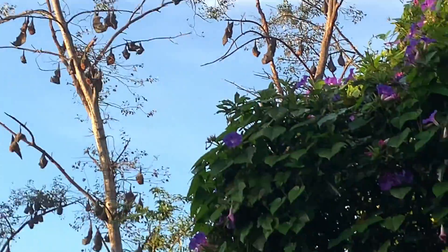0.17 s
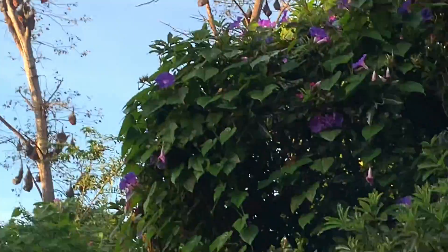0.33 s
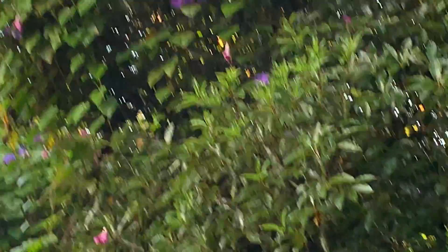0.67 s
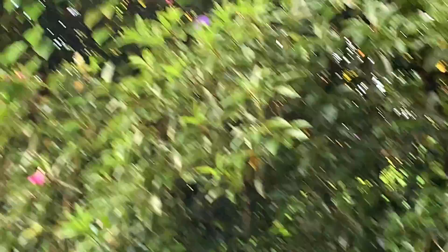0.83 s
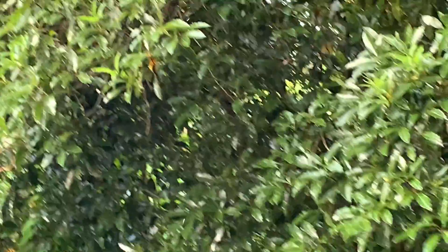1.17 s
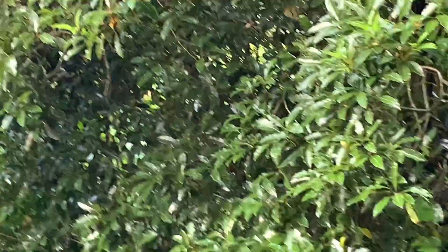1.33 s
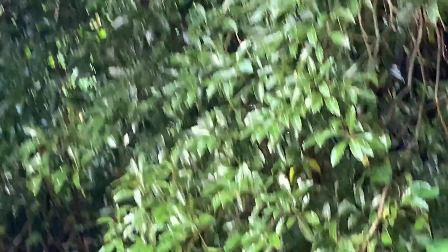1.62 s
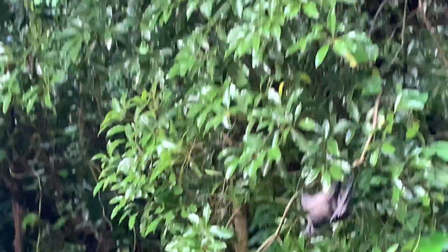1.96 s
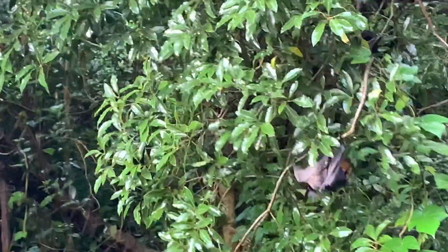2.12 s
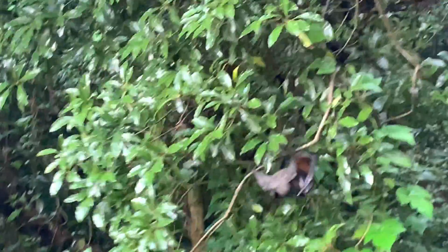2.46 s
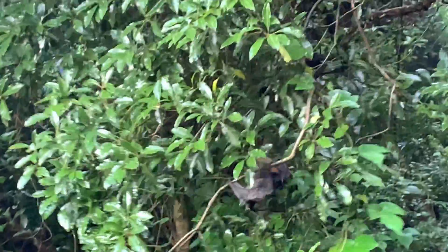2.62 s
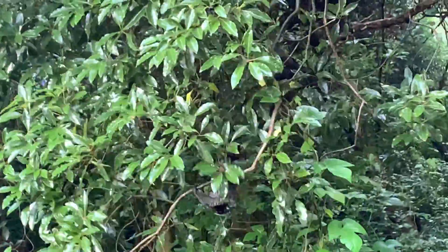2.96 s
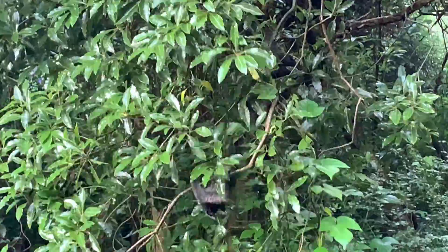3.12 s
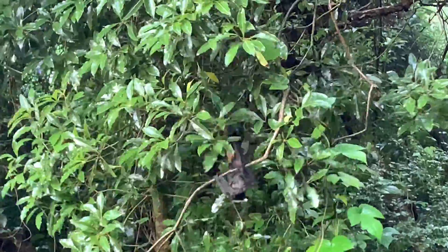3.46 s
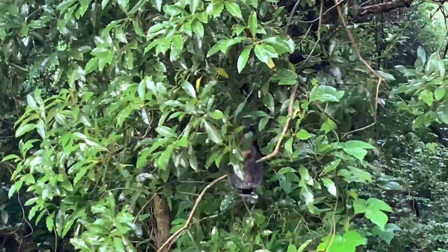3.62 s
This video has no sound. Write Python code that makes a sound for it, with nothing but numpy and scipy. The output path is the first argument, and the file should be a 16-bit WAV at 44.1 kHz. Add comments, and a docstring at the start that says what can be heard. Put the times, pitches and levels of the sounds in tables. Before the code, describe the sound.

Many distant bats chatter outdoors, with nearer rasping screeches, faint hoots and occasional rustles over a low rumble. Close by, one scolds in short bursts and others grumble; a high squeal, rough shrieks and a squeaky chitter follow.

```python
"""A flying fox colony roosts in trees. From the start, hundreds of far bats chatter over a low outdoor
rumble, with nearer rasps, distant hoots and now and then a bright rustle. After a second, one bat
scolds close by and others grumble. A long squeal follows, then harsh shrieks, and after three seconds
a thin squeak and a quick chitter. Buzzy calls are pulses of the vocal folds shaped by the throat;
whistled ones are a few unsteady tones. Trunks and leaves scatter every call."""
import sys
import numpy as np
from scipy import signal
from scipy.fft import rfft, irfft, next_fast_len
from scipy.io import wavfile

SR = 44100
rng = np.random.default_rng(int(sys.argv[2]) if len(sys.argv) > 2 else 0)


def store_pcm(level_fs):
    """Save levels as 16-bit WAV."""
    pcm = np.round(np.clip(level_fs, -1, 1) * 32767).astype(np.int16)
    wavfile.write(sys.argv[1], SR, np.atleast_2d(pcm).T)


N = 167139

NEAR_WET_DB, MID_WET_DB = -12, 3.5  # echo level against the direct sound: near bats, the next trees
RIGHT_SIDE_S = -.00027  # a sound from the right reaches the right channel this much sooner
WAVER_HZ = 332.3  # how fast the pitch of a torn note shakes


def undb(db):
    """Turn decibels into a factor to multiply by."""
    return 10 ** (np.asarray(db) / 20)


def unit(x):
    """Scale a signal to an average strength (rms) of 1."""
    return x / np.sqrt(np.mean(x ** 2) + 1e-18)


def colour(x, points):
    """Make some frequencies louder and others softer, along points of f/Hz, level/dB."""
    hz, db = np.array(points, float).T
    n = x.shape[-1]
    size = next_fast_len(n + 256)
    f = np.arange(size // 2 + 1) * SR / size
    gain = undb(np.interp(np.log(f + 1), np.log(hz), db))
    return irfft(rfft(x, size) * gain, size)[..., :n]


def wobble(n, hz):
    """Random wavering at about this rate, with a typical size of 1; at the rate SR it is hiss."""
    at = np.arange(n) * hz / SR
    knots = np.random.default_rng(rng.integers(2 ** 31)).standard_normal(int(at[-1]) + 2)
    return np.sqrt(1.5) * np.interp(at, np.arange(len(knots)), knots)


def gesture(length, hz, end_hz, attack_s=.0081, release_s=.025):
    """Pitch and loudness of one call: it slides, bowing up in the middle, and fades in and out."""
    t = np.arange(int(max(length, .01) * SR)) / SR
    progress = t / t[-1]
    shape = np.clip(t / attack_s, 0, 1) * np.clip((t[-1] - t) / release_s, 0, 1)
    arch = 1 + .01905 * (np.sin(np.pi * progress) - 2 / np.pi)
    return (hz + (end_hz - hz) * progress) * arch, unit(shape)


def whistle(hz, partials_db, jitter, flutter_db, flutter_hz):
    """Tones at 1, 2, 3... times the pitch (partials); jitter shakes the pitch, flutter the loudness."""
    n = len(hz)
    phase = 2 * np.pi * np.cumsum(hz * (1 + jitter * wobble(n, hz=1309.5))) / SR
    tone = sum(undb(db) * np.sin((k + 1) * phase) for k, db in enumerate(partials_db))
    return unit(tone * undb(flutter_db * wobble(n, flutter_hz)))


def buzz(hz, rough):
    """Uneven pulses of the vocal folds, with a puff of air once a cycle."""
    n = len(hz)
    unsteady = 1 + .0913 * rough * wobble(n, hz=600) + .00408 * wobble(n, hz=60.3)
    cycles = np.cumsum(hz * unsteady) / SR
    offset = (cycles % 1 - .5) * SR / hz  # samples from the nearest pulse
    pulses = np.sinc(offset) * np.exp(-(offset / 6) ** 2)
    air = np.exp(-(cycles % 1) / .5) * wobble(n, SR)
    voice = unit(pulses - pulses.mean()) + 1.79 * rough * unit(air)
    return voice * undb(3.5 * rough * wobble(n, hz=176.5))


def throat_filter(x, points):
    """The throat rings after each pulse, most at the peaks among the points of f/Hz, level/dB."""
    hz, db = np.array(points, float).T
    size = 512
    f = np.arange(size // 2 + 1) * SR / size
    gain = undb(np.interp(np.log(f + 1), np.log(hz), db))
    # folding the cepstrum (the log spectrum turned into time) puts all ringing after the pulse
    cepstrum = irfft(np.log(gain))
    cepstrum[1:size // 2] *= 2
    cepstrum[size // 2 + 1:] = 0
    ring = irfft(np.exp(rfft(cepstrum)))
    return signal.fftconvolve(x, ring)[:len(x)]


def add(out, start, x, lead=0):
    """Mix a sound into both channels; the left gets it lead seconds sooner (later if negative)."""
    for channel, at in zip(out, (start, start + lead)):
        i = int(round(at * SR))
        a, b = max(i, 0), min(i + len(x), N)
        if b > a:
            channel[a:b] += x[a - i:b - i]


def trees(x, wet_db, fade_s=.46, dull_hz=5550):
    """Trunks and leaves scatter a sound into a short, duller echo, different on each side."""
    t = np.arange(SR // 2) / SR
    tail = rng.standard_normal((2, len(t))) ** 3 * np.exp(-np.log(1000) * t / fade_s)
    lowpass = signal.butter(1, dull_hz, fs=SR, output="sos")
    tail = signal.sosfilt(lowpass, unit(tail)) / np.sqrt(len(t))
    echo = signal.fftconvolve(x, tail, axes=1)[:, :N]
    return (x + undb(wet_db) * echo) / np.hypot(1, undb(wet_db))


def rumble(alike_below_hz=473):
    """Low outdoor background noise, alike on both sides in the bass."""
    # tone of the noise: f/Hz, relative level/dB
    spectrum = [(20, -36), (30, -27), (40, -2.5), (55, 1.5), (80, 1), (110, -13.5), (200, -10.5),
                (350, -15.5), (570, -21), (800, -27), (2000, -20), (16000, -47)]
    # its loudness over time: t/s, level/dB
    loudness = [(0, -47), (1.45, -48), (1.6, -45.5), (2.4, -47), (3.2, -46.5), (3.79, -45)]
    mid, side = rng.standard_normal((2, N))
    side = signal.sosfilt(signal.butter(1, alike_below_hz, "high", fs=SR, output="sos"), side)
    noise = unit(colour(np.array([mid + side, mid - side]), spectrum))
    return noise * undb(np.interp(np.arange(N) / SR, *np.array(loudness).T))


def colony(calls_per_s=70, call_s=.07, call_hz=620.1):
    """Many far bats chatter at once, each with its own pitch, slide, roughness and place."""
    # tone of the far throats: f/Hz, relative level/dB
    throat = [(100, -31), (400, -25.5), (570, -16), (700, -26.5), (880, -24.5), (1100, -16), (1400, -16),
              (2150, -11), (2450, -5.5), (3250, -3.5), (4000, -8), (5500, -13), (6700, -12), (7500, -14),
              (9300, -22), (10800, -25), (13500, -28), (16000, -29)]
    # loudness of the whole roost: t/s, level/dB
    loudness = [(0, -31), (.15, -35.5), (.22, -38.5), (.5, -34), (.75, -36.5), (1.0, -33), (1.2, -27),
                (1.45, -31), (1.7, -32), (2.0, -28), (2.199, -29.5), (2.5, -31.5), (2.85, -33), (3.05, -33),
                (3.4, -34), (3.79, -31.5)]
    out = np.zeros((2, N))
    for k in range(int(calls_per_s * (N / SR + call_s))):
        long, high, glide, loud, rough = rng.standard_normal(5).clip(-2, 2)
        when, place = rng.random(2)
        hz = call_hz * np.exp(.3 * high)
        pitch, shape = gesture(call_s * np.exp(.5 * long), hz, hz * np.exp(.08 * glide))
        voice = unit(buzz(pitch, min(.26 * np.exp(.45 * rough), 1)))
        lead = .0003 + .00025 * (2 * place - 1)  # the roost spreads out to the left
        add(out, (k + when) / calls_per_s - call_s, undb(3 * loud) * shape * voice, lead)
    din = unit(colour(trees(out, wet_db=0), throat))
    return din * undb(np.interp(np.arange(N) / SR, *np.array(loudness).T))


def hoots():
    """Low, nearly pure calls from further off."""
    # one hoot a row: start/s, length/s, pitch/Hz, end pitch/Hz, level/dB, lead on the left/s
    calls = [(0.182, 0.082, 1138, 1088, -46.5, 0.0017), (0.26, 0.06, 1118, 1087, -48, 0.0048),
             (0.689, 0.19, 1137, 1088, -49, 0.0019), (0.755, 0.12, 1786, 1715, -48, -0.0018),
             (0.846, 0.18, 1708, 1735, -47, -0.0023), (1.21, 0.039, 802, 850, -52.5, -.0002),
             (1.26, 0.101, 1087, 1182, -50.5, 0.00015), (1.416, 0.045, 1060, 925, -46.5, -.0002),
             (1.764, 0.12, 1054, 1155, -51, 0.0047), (1.95, 0.051, 880, 835, -50, 0.0039),
             (2.269, 0.12, 1077, 1109, -48, 0.0067), (2.329, 0.234, 1556, 1558, -51.5, -.0002),
             (2.367, 0.047, 984, 920, -50, -0.006), (2.482, 0.035, 970, 916, -47.5, -0.0031),
             (2.73, 0.055, 1176, 1105, -53, -0.0018), (3.108, 0.2, 1120, 1102, -52.5, -.0002),
             (3.325, 0.11, 1075, 1006, -48.5, -0.0033)]
    out = np.zeros((2, N))
    for start, length, hz, end_hz, db, lead in calls:
        pitch, shape = gesture(length, hz, end_hz)
        voice = whistle(pitch, partials_db=[0, -31], jitter=.041, flutter_db=3, flutter_hz=68)
        add(out, start, undb(db) * shape * voice, lead)
    return trees(out, wet_db=-2)


def rustles():
    """Bright, grainy swishes close by, each swelling and fading."""
    # one swish a row: start/s, length/s, level/dB
    swishes = [(-.03, 0.23, -47), (1.194, 0.2, -38), (1.614, 0.23, -43), (1.985, 0.52, -50),
               (2.272, 0.17, -41), (2.344, 0.17, -40), (2.547, 0.36, -50), (3.2, 0.18, -48),
               (3.738, 0.1, -45)]
    # their tone: f/Hz, relative level/dB
    spectrum = [(2000, -40), (6500, 5.5), (9500, 4.5), (11000, 0.5), (12500, -1), (15500, 0)]
    out = np.zeros((2, N))
    for start, length, db in swishes:
        n = int(length * SR)
        grains = colour(wobble(n, SR) * undb(2.5 * wobble(n, hz=358)), spectrum)
        swell = np.sin(np.pi * np.arange(n) / n)
        add(out, start, undb(db) * unit(grains * swell), RIGHT_SIDE_S)
    return out


def harsh_calls(calls, throat):
    """Very rough pulses of the vocal folds ring through a throat."""
    out = np.zeros((2, N))
    for start, length, hz, end_hz, db, rough in calls:
        pitch, shape = gesture(length, hz, end_hz)
        voice = unit(throat_filter(buzz(pitch, rough), throat))
        add(out, start, undb(db) * shape * voice, RIGHT_SIDE_S)
    return trees(out, MID_WET_DB)


def grumbles():
    """Hoarse calls through a throat that rings low."""
    # one grumble a row: start/s, length/s, pitch/Hz, end pitch/Hz, level/dB, roughness/0-1
    calls = [(1.1, 0.15, 436, 440, -45.5, 0.94), (1.28, 0.069, 436, 461, -39, .6),
             (1.41, 0.079, 474, 437, -39.5, 0.5), (1.76, 0.26, 397, 418, -41, .8)]
    # tone of the throat: f/Hz, relative level/dB
    throat = [(150, -50), (700, -24), (1100, -8), (1650, 10), (2200, -4), (4000, -23), (12000, -50)]
    return harsh_calls(calls, throat)


def shrieks():
    """Harsh calls, made bright by a wide open mouth."""
    # one shriek a row: start/s, length/s, pitch/Hz, end pitch/Hz, level/dB, roughness/0-1
    calls = [(1.9, 0.092, 518, 484, -39, 0.7), (2.275, 0.11, 570, 607, -40, 0.77),
             (2.351, 0.18, 619, 598, -37, 0.73), (2.55, 0.063, 605, 630, -33.5, 0.87),
             (2.602, 0.061, 591, 622, -37, 0.59), (2.662, 0.053, 598, 575, -34.5, 0.95)]
    # tone of the open throat: f/Hz, relative level/dB
    throat = [(150, -40), (500, -32), (1500, -16), (2600, -16), (3800, -24), (4900, -5), (6000, -3),
              (7400, 0), (9300, -5), (10800, -21), (16000, -12)]
    return harsh_calls(calls, throat)


def rasps():
    """Bats in the next trees, to the left, screech on one torn note and its overtone."""
    # one rasp a row: start/s, length/s, pitch/Hz, end pitch/Hz, level/dB, overtone against the note/dB
    calls = [(.0, 0.2, 3280, 3243, -41.5, 6), (0.099, 0.07, 3270, 3210, -33.5, -6),
             (0.246, .04, 3280, 3230, -41, -22), (0.299, 0.06, 3236, 3250, -38, -12),
             (0.351, 0.15, 3320, 3100, -33, -9.5), (0.493, 0.14, 3126, 3047, -33.5, -6),
             (0.597, 0.097, 3255, 3210, -33, 0), (0.854, 0.22, 3255, 3070, -36.5, -4.5),
             (1.423, 0.17, 3140, 2930, -36, -24), (1.544, 0.037, 5300, 4980, -36, -26),
             (1.557, 0.014, 3200, 3230, -31, -20), (1.592, 0.066, 3123, 3148, -29, -17),
             (1.617, 0.081, 6100, 6170, -36, -7), (1.849, 0.079, 3320, 3640, -32.5, -27),
             (1.991, 0.073, 2696, 2804, -33.5, -23), (2.009, 0.037, 3180, 3170, -33.5, -30),
             (2.168, 0.1, 3095, 2980, -39, -9), (2.27, 0.24, 2950, 2700, -39, -9),
             (2.411, 0.062, 4910, 4900, -34, -22), (2.79, 0.116, 3520, 3330, -45, -23),
             (2.92, 0.21, 3250, 3170, -37, -30), (3.022, 0.13, 2760, 2680, -41.5, -28),
             (3.141, 0.053, 2750, 2433, -34.5, -9), (3.222, 0.056, 2485, 2480, -35, 1),
             (3.045, .45, 4830, 4840, -42.5, -30), (3.323, 0.052, 3140, 3116, -39, -18),
             (3.453, 0.26, 3227, 3324, -37, -17), (3.463, 0.27, 2673, 2826, -39, -0.5)]
    out = np.zeros((2, N))
    for start, length, hz, end_hz, db, overtone_db in calls:
        pitch, shape = gesture(length, hz, end_hz)
        pitch = pitch * (1 + .03 * wobble(len(pitch), WAVER_HZ))
        voice = whistle(pitch, [0, overtone_db, -47], jitter=.04, flutter_db=1.5, flutter_hz=161.6)
        add(out, start, undb(db) * shape * voice, lead=.00033)
    return trees(out, MID_WET_DB)


def chitter(count=4, start_s=3.245, notes_per_s=18.8, level_db=-40):
    """A near bat gives a sizzling run of short, high, rising notes."""
    # the first three partials of a note: relative level/dB
    partials = [0, -14, -2]
    out = np.zeros((2, N))
    for k in range(count):
        pitch, shape = gesture(length=.06, hz=4880, end_hz=5210)
        voice = whistle(pitch, partials, jitter=.024, flutter_db=5, flutter_hz=589)
        add(out, start_s + k / notes_per_s, undb(level_db) * shape * voice, RIGHT_SIDE_S)
    return trees(out, NEAR_WET_DB)


def torn_note(curve, octave_db):
    """One long whistled note from a near bat; the rougher it gets, the more its pitch shakes."""
    times, hz, db, rough, third_db = np.array(curve).T
    t = np.arange(times[0], times[-1], 1 / SR)
    torn = np.interp(t, times, rough)
    pitch = np.interp(t, times, hz) * (1 + .012 * torn * wobble(len(t), WAVER_HZ))
    partials = [0, octave_db, np.interp(t, times, third_db)]
    voice = whistle(pitch, partials, jitter=.055 * torn, flutter_db=2.5, flutter_hz=682)
    out = np.zeros((2, N))
    add(out, times[0], voice * undb(np.interp(t, times, db)), RIGHT_SIDE_S)
    return trees(out, NEAR_WET_DB)


def squeak():
    """A thin, high note that climbs and frays."""
    # course of the note: t/s, pitch/Hz, level/dB, roughness, third partial against the first/dB
    curve = [(3.08, 3580, -58, 0, 0), (3.13, 3740, -47.5, 0.5, 2), (3.2, 4020, -49, 0.8, 5),
             (3.28, 4210, -41, 0.7, -4), (3.42, 4220, -44, 0.8, 0), (3.52, 4150, -62, .9, 0)]
    return torn_note(curve, octave_db=-16)


def squeal():
    """A loud note that rises and tears as its third partial grows shrill."""
    # course of the note: t/s, pitch/Hz, level/dB, roughness, third partial against the first/dB
    curve = [(1.655, 3590, -44, 0.32, -18), (1.685, 3660, -28.5, 0.15, -9), (1.72, 3660, -33, 0.3, -7),
             (1.75, 3780, -36, 0.55, 0.5), (1.8, 3870, -32, 0.75, -5), (1.88, 3890, -37, 0.9, -4),
             (1.95, 3710, -34, 1.3, -12)]
    return torn_note(curve, octave_db=1.5)


def squabble():
    """A near bat scolds in short syllables; the wider its mouth, the stronger its high ring."""
    # syllables: start/s, length/s, pitch/Hz, end pitch/Hz, level/dB, roughness/0-1, high ring gain/dB
    syllables = [(1.06, 0.065, 515, 517, -33.5, 0.53, -14), (1.098, 0.048, 497, 563, -28.5, 0.28, -2),
                 (1.143, 0.053, 646, 666, -28.5, 1, 7), (1.194, 0.043, 651, 633, -30, 0.87, 5),
                 (1.251, 0.016, 643, 653, -26, 0.2, 3), (1.271, 0.017, 660, 660, -25, 0.17, -1),
                 (1.29, 0.0483, 650, 623, -27, 0.51, 5), (1.367, 0.032, 505, 500, -27, 0.06, 6)]
    # tone of the throat: f/Hz, relative level/dB
    throat = [(150, -53), (500, -35), (1500, -27), (2600, -21), (3230, 6), (3750, -10), (4450, -9),
              (5300, -6), (7500, -24), (9500, -20), (11000, -41), (16000, -27)]
    # the ring that comes up as the mouth opens: f/Hz, relative level/dB
    high_ring = [(1000, -50), (3300, -22), (3950, -7), (4530, 0), (5200, -16), (8000, -40)]
    out = np.zeros((2, N))
    for start, length, hz, end_hz, db, rough, ring_db in syllables:
        pitch, shape = gesture(length, hz, end_hz, attack_s=.005, release_s=.005)
        folds = buzz(pitch, rough)
        voice = throat_filter(folds, throat) - undb(ring_db) * throat_filter(folds, high_ring)
        add(out, start, undb(db) * shape * unit(voice), lead=-.00029)
    return trees(out, wet_db=-7)


def scene():
    """Near callers over the din of the roost."""
    near = squabble() + squeal() + squeak() + chitter() + rustles()
    further = shrieks() + grumbles() + rasps() + hoots()
    return near + further + rumble() + colony()


def record(dry, treble_hz=7200, early_s=.000184, top_hz=15800):
    """The recorder feeds the left treble to both sides, the right a little early, and cuts the top."""
    size = next_fast_len(N + 256)
    left, right = rfft(dry, size)
    f = np.arange(len(left)) * SR / size
    shared = 1 - 1 / (1 + (f / treble_hz) ** 16)  # 0 in the bass, 1 in the high treble
    early_left = left * np.exp(2j * np.pi * f * early_s)
    right = np.sqrt(1 - shared) * right + np.sqrt(shared) * early_left
    both = irfft(np.array([left, right]), size)[:, :N]
    return signal.sosfilt(signal.ellip(10, .2, 80, top_hz, fs=SR, output="sos"), both)


dry = scene()
out = record(dry)
store_pcm(out)
```